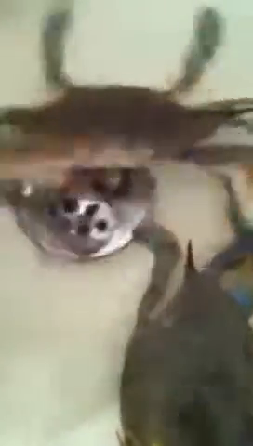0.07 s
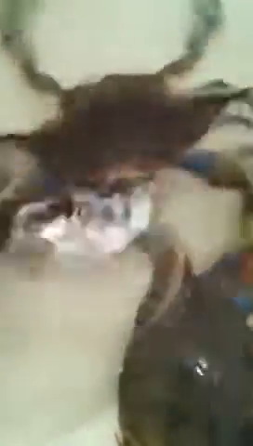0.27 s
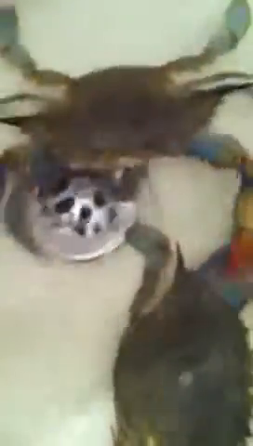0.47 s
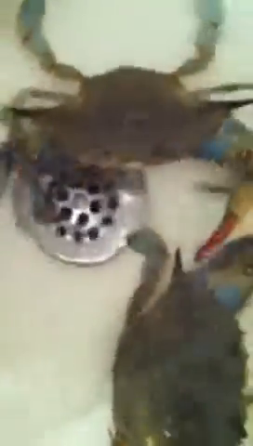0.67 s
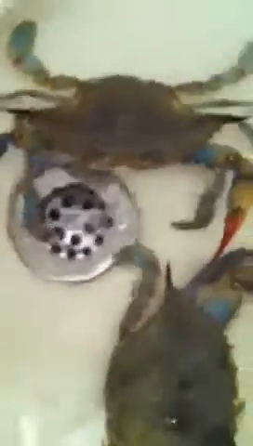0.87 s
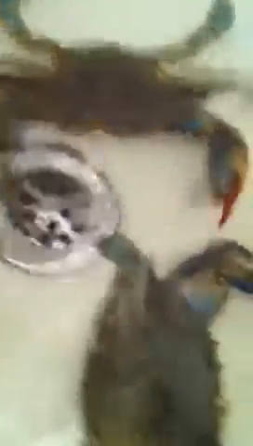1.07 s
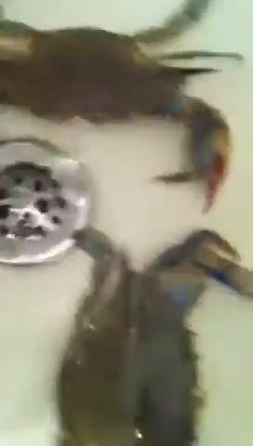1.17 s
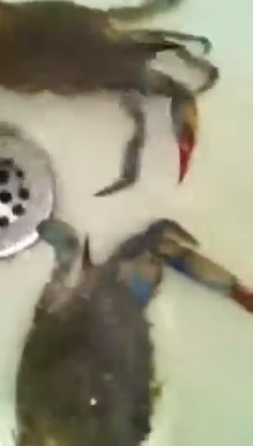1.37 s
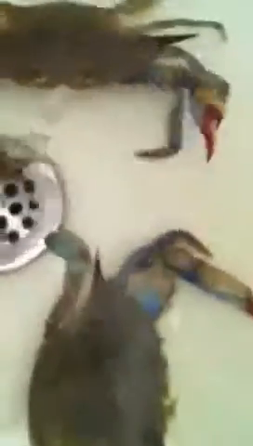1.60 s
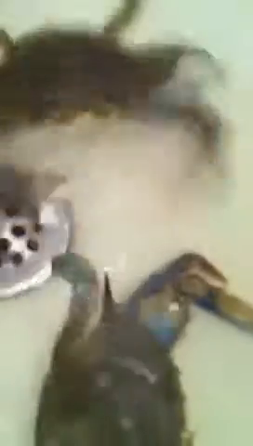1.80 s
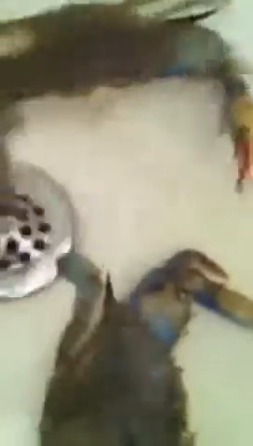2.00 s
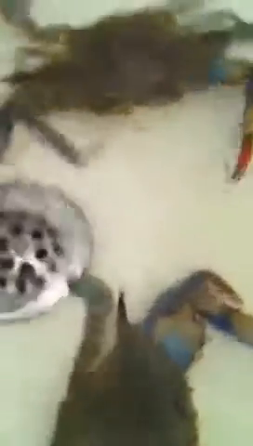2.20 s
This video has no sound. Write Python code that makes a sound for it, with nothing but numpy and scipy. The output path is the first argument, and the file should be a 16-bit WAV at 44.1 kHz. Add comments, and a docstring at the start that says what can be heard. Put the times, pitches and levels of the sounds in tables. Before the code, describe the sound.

Crab claws and shells clack against a wet tub. After faint ticks, a loud brittle cluster rattles at 0.2 s, with smaller knocks and hollow pops until about 0.4 s. Low hum and faint hiss fill the quiet gap, with barely audible scuffs. A very sharp, bright double snap hits at 1.8 s, then soft lower bloops and ticks from 1.95 to 2.2 s. The tiled room rings briefly.

```python
"""Crabs scrabble in a wet bathtub: claws and shells clack, small air pockets pop, legs scuff the wall,
and the tiled bathroom rings after each sound over a low building hum and microphone hiss.
Clacks are gritty contacts ringing shell modes, pops are dying sines gliding in pitch (most rise),
scuffs are resonant grit, the room is tub echoes plus noise tails, hum and hiss are shaped noise."""
import sys
import numpy as np
from scipy import signal
from scipy.io import wavfile
from scipy.ndimage import uniform_filter1d

SR = 44100
rng = np.random.default_rng(int(sys.argv[2]) if len(sys.argv) > 2 else 0)


def master(y):
    """Save y as 16-bit WAV."""
    cut = np.clip(np.atleast_2d(y).T, -1, 1)
    pcm = np.round(cut * 32767)  # scale
    wavfile.write(sys.argv[1], SR, pcm.astype(np.int16))


def natural_amplitude(level_db):
    """Convert a level in decibels to a linear amplitude factor, elementwise."""
    exponent = np.asarray(level_db, float) / 20
    return 10 ** exponent


N = 99225


def read(points, hz):
    """Interpolates a (Hz, value) curve on a log-frequency axis."""
    f, value = np.transpose(points)
    return np.interp(np.log(hz + 1), np.log(f + 1), value)


def add(mix, start_s, sound):
    """Mixes a sound in at start_s, cut at the end of the mix."""
    part = mix[round(start_s * SR):][:len(sound)]
    part += sound[:len(part)]


def peaked(x):
    """Scales to peak 1."""
    return x / (abs(x).max() + 1e-20)


def hum():
    """Low building hum and microphone hiss: random short-time spectra with faint patches."""
    # noise spectrum: (frequency [Hz], relative level [dB])
    hum_spectrum = [(15, -42.5), (25, -18), (27, -37), (48, -40), (64, -18.5), (107, -15.5), (140, 0.5),
                    (194, -4.5), (247, 1), (350, -14.5), (553, -16.5), (874, -16), (948, -14), (1310, -21),
                    (1420, -21.5), (2430, -23), (3640, -25), (4900, -25.5), (5920, -26), (11300, -26),
                    (15600, -26)]
    # slow drift of the low hum, used relative to its mean: (time [s], level [dB])
    hum_drift = [(0.0, -68.5), (0.09, -67), (1.16, -69), (1.65, -66), (1.82, -73.5), (2.25, -73.5)]
    rms_db, patch_rms_db = -64, 0.5
    hum_top_hz, hiss_top_hz = 446, 15850
    size, hop = 4096, 1024
    frames, hz = N // hop + 5, np.fft.rfftfreq(size, 1 / SR)

    real, imag, patches = rng.standard_normal((frames, len(hz), 3)).T
    patches = uniform_filter1d(uniform_filter1d(patches, 40, axis=0), 3, axis=1)
    shape_db = read(hum_spectrum, hz)[:, None] + patch_rms_db * patches / patches.std()
    spectra = (real + 1j * imag) * (hz < hiss_top_hz)[:, None] * natural_amplitude(shape_db)

    drift_s, drift_db = np.transpose(hum_drift)
    frame_s = (np.arange(frames) - 1) * hop / SR
    spectra[hz < hum_top_hz] *= natural_amplitude(np.interp(frame_s, drift_s, drift_db - drift_db.mean()))
    x = signal.istft(spectra, nperseg=size, noverlap=size - hop)[1][:N]
    return natural_amplitude(rms_db) * x / x.std()


def pop(level_db, start_hz, ratio, t60_s):
    """Air pocket, or a tonal ring with a clack: a dying sine whose pitch glides by ratio over half its t60."""
    rise_cycles = 1.8
    t = np.arange(0, t60_s, 1 / SR)
    pitch_hz = start_hz * ratio ** np.minimum(2 * t / t60_s, 1)
    rise = 1 - np.exp(-t * start_hz / rise_cycles)
    return natural_amplitude(level_db - 60 * t / t60_s) * rise * np.sin(2 * np.pi * np.cumsum(pitch_hz) / SR)


def clack(treble_db, mid_db, low_db, contact_s):
    """A hard tick and contact grit ring the shell's modes, levelled in three bands; the tub wall thumps."""
    # shell modes: (nominal frequency [Hz], nominal level [dB], t60 [s])
    shell_modes = [(1900, -4, 0.0013), (2600, 11, 0.0022), (3200, 9.5, 0.0019), (4100, 5, 0.0016),
                   (5630, -7.5, .002), (6870, 1, 0.0011), (7050, 5, 0.0018), (8260, 10.5, 0.0015),
                   (10430, -3.5, 0.0052), (11640, 6.5, 0.0032), (13200, 1.5, .002), (12690, 14.5, 0.001),
                   (14800, 1.5, .0015)]
    # limits of the low, upper mid and treble bands: [Hz]
    band_edges_hz = (1150, 4700, 9500, 15700)
    mode_spread_db, mode_detune = 4, 0.039  # either way
    grit_per_s, touch_s = 9000, 0.0002
    thump_db, thump_s = -29, 0.0008  # thump_db is relative to the treble level
    count = 900
    t = np.arange(count) / SR

    signs = np.sign(rng.random(count) - 0.5)
    grit = signs * (rng.random(count) < grit_per_s / SR) * np.exp(-t / abs(contact_s))
    grit[0] = 1  # first tick
    ringing = np.zeros(count)
    for mode_hz, mode_db, t60_s in shell_modes:
        u, v = rng.uniform(-1, 1, 2)
        decay = natural_amplitude(mode_db + mode_spread_db * u - 60 * t / t60_s)
        ring = decay * np.sin(2 * np.pi * mode_hz * (1 + mode_detune * v) * t)
        ringing += np.convolve(grit, ring)[:count]
    ringing *= (1 - np.exp(-t / touch_s)) ** 2

    # wall pushed, then released
    push = (1 - t / thump_s) * np.exp(-t / thump_s)
    out = natural_amplitude(treble_db + thump_db) * push * np.minimum(t / touch_s, 1)
    for band_db, limits_hz in zip((low_db, mid_db, treble_db), zip(band_edges_hz, band_edges_hz[1:])):
        sos = signal.butter(4, limits_hz, "band", fs=SR, output="sos")
        out += natural_amplitude(band_db) * peaked(signal.sosfilt(sos, ringing))
    return out


def scuff(length_s, level_db, centre_hz, width_hz):
    """Leg on the tub wall: dense grit of uneven size through a broad resonance, twice, under a stroke."""
    grit_per_s, size_spread_db = 9000, 2.5
    count = 24000  # longer strokes are cut here
    t = np.arange(count) / SR
    sign_draw, grain_draw, size_draw = rng.random((3, count))
    grains = np.sign(sign_draw - 0.5) * (grain_draw < grit_per_s / SR)
    grit = grains * natural_amplitude(-size_spread_db * np.log(size_draw + 0.0035))
    b, a = signal.iirpeak(centre_hz, centre_hz / width_hz, SR)
    rub = signal.lfilter(b, a, signal.lfilter(b, a, grit))
    stroke = np.sqrt(np.clip(1 - t / length_s, 0, 1)) * np.minimum(t / length_s / 0.14, 1)
    return natural_amplitude(level_db) * rub / rub.std() * stroke


def bathroom(x):
    """Echoes off the tub walls, then three noise tails fed in turn, each band dying at its own speed."""
    # tub wall reflections: (delay [s], level [dB])
    tub_echoes = [(.0029, -19), (.0062, -16.5), (0.0105, -22), (.0175, -39), (.0235, -24)]
    # room decay: (frequency [Hz], t60 [s])
    room_t60 = [(300, 0.8), (790, 0.16), (2090, 0.29), (5510, 0.28), (14600, 0.22)]
    # initial tail spectrum: (frequency [Hz], relative level [dB])
    room_colour = [(200, -26.5), (500, 26.5), (1000, -0.3), (3000, 2.7), (7000, 5.1), (12000, 3.5),
                   (15500, 2.5), (16300, -21.5)]
    tail_db, tail_start_s, turn_hz = -13.5, 0.003615, 7

    early = np.zeros(SR // 20)
    for delay_s, echo_db in tub_echoes:
        early[round(delay_s * SR)] = natural_amplitude(echo_db)

    count = SR // 2
    noise = rng.standard_normal((3, count)) * (np.arange(count) > tail_start_s * SR)
    hz, t, spectra = signal.stft(noise, SR, nperseg=128)
    decay_db = read(room_colour, hz)[:, None] - 60 * t / read(room_t60, hz)[:, None]
    tails = signal.istft(spectra * natural_amplitude(decay_db), SR, nperseg=128)[1]

    phase = 2 * np.pi * turn_hz * np.arange(N) / SR
    wet = np.zeros(N)
    for k, tail in enumerate(tails):
        wet += signal.fftconvolve(x * np.cos(phase + k * np.pi / 3), tail)[:N]
    return signal.fftconvolve(x, early)[:N] + natural_amplitude(tail_db) * wet / np.linalg.norm(tails[0])


def scene():
    """Crabs in the tub, the bathroom around them, the hum."""
    # air pockets, plus a few clear rings that sound with clacks (near 950 Hz at 0.21 and 0.22 s, near 7.7 kHz
    # at 2.175 s): (time [s], level [dB], start pitch [Hz], end-to-start pitch ratio, t60 [s])
    pops = [(0.001, -59.5, 2260, 1.1, 0.086), (.0285, -40, 3370, 1.17, 0.013),
            (.0405, -48.5, 3385, 0.93, 0.029), (.3185, -31, 3470, 1.02, 0.0067),
            (.3797, -33.5, 5000, .97, 0.019), (.3855, -16, 3940, 1.1, 0.0038),
            (.3932, -27.5, 1524, 1.24, 0.045), (0.413, -37.5, 1550, 1.2, 0.066),
            (1.12, -58.5, 4670, 0.92, .012), (1.7845, -40, 2420, 1.8, 0.04), (1.797, -37, 2200, .95, .015),
            (1.9, -55, 1340, 1.18, 0.12), (1.918, -41.5, 4130, 2, 0.011), (1.9575, -42.5, 580, 1.48, .03),
            (1.9665, -27.5, 836, 1.08, 0.029), (1.974, -33, 994, 1.09, 0.021),
            (2.003, -34, 926, 1.18, 0.011), (2.013, -51.5, 833, 1.8, 0.055), (1.987, -37, 870, 2.2, 0.027),
            (2.11, -49, 1900, 1.46, 0.013), (2.127, -49, 1820, 1.06, 0.018), (2.004, -46, 3630, 0.9, 0.011),
            (1.978, -45.5, 2940, 0.93, 0.03), (1.9835, -22.5, 2040, 0.94, 0.006),
            (2.0919, -29.5, 1850, 1.06, 0.022), (2.0919, -31.5, 2230, 0.894, 0.012),
            (2.162, -60.5, 4620, 1.07, .015), (2.1756, -39, 7760, 1.53, 0.009),
            (1.9545, -39, 8250, 1.02, 0.0055), (1.989, -45, 14800, 1.5, 0.0037),
            (.162, -61.5, 3200, 1.03, 0.027), (.165, -48, 1800, 0.8, 0.019), (.675, -46, 4100, 1.8, 0.013),
            (.2105, -26.5, 971, 0.58, 0.019), (.2222, -29.5, 990, 1.2, 0.018),
            (.2228, -28.5, 4120, 1.02, 0.019), (1.831, -20.5, 7240, 0.65, .005),
            (0.2325, -15, 7200, 2.8, 0.004)]
    # claw and shell contacts:
    # (time [s], treble peak [dB], upper mid peak [dB], low peak [dB], contact decay [s])
    clacks = [(0.0039, -55.0, -53.0, -64.0, 0.0007), (0.0282, -47.0, -46.0, -57.0, 0.0004),
              (0.204, -40, -43, -70, 0.003), (0.2074, -18.0, -22.0, -34.0, 0.0007),
              (0.2083, -11.0, -15.0, -24.0, 0.001), (0.2116, -7.0, -15.0, -13.0, 0.0004),
              (0.2218, -11.0, -20.0, -20.0, 0.0004), (0.2231, -16.0, -15.0, -19.0, 0.001),
              (0.2248, -20.0, -22.0, -24.0, 0.0007), (0.2305, -23.0, -29.0, -36.0, 0.001),
              (0.2874, -21.0, -29.0, -42.0, 0.001), (0.2907, -28.0, -37.0, -46.0, 0.0007),
              (0.3189, -36.0, -36.0, -46.0, 0.0007), (0.3794, -43.0, -45.0, -50.0, 0.0007),
              (0.3859, -37.0, -44.0, -45.0, 0.001), (0.3929, -22.0, -23.0, -32.0, 0.001),
              (0.4002, -23.0, -24.0, -29.0, 0.0004), (0.4014, -29.0, -30.0, -32.0, 0.0007),
              (0.7555, -52.0, -69.0, -80.0, 0.0007), (1.0225, -52.0, -72.0, -80.0, 0.0007),
              (1.2493, -51.0, -68.0, -78.0, 0.0007), (1.3966, -50.0, -75.0, -79.0, 0.0007),
              (1.785, -44.0, -47.0, -50.0, 0.0007), (1.7917, -50.0, -46.0, -55.0, 0.0007),
              (1.797, -65.0, -42.0, -52.0, 0.0007), (1.8028, -36, -40, -60, 0.002),
              (1.8055, -7.0, -21.0, -36.0, 0.001), (1.8078, -3.0, -28.0, -23.0, 0.0004),
              (1.8102, -19.0, -33.0, -38.0, 0.0007), (1.8232, -26.0, -32.0, -50.0, 0.0007),
              (1.832, -21.0, -35.0, -49.0, 0.001), (1.8375, -27.0, -36.0, -53.0, 0.0007),
              (1.9192, -53.0, -46.0, -51.0, 0.0007), (1.9251, -43.0, -56.0, -56.0, 0.0007),
              (1.9541, -41.0, -47.0, -62.0, 0.0007), (1.9578, -39.0, -42.0, -37.0, 0.0004),
              (1.9673, -48.0, -51.0, -51.0, 0.0007), (1.9835, -37.0, -40.0, -42.0, 0.0004),
              (1.9888, -42.0, -55.0, -50.0, 0.0007), (2.0056, -50.0, -47.0, -50.0, 0.0007),
              (2.0399, -50.0, -68.0, -69.0, 0.0007), (2.0921, -48.0, -51.0, -46.0, 0.0007),
              (2.1754, -39.0, -49.0, -68.0, 0.0004)]
    # leg strokes: (time [s], length [s], level [dB], centre [Hz], width [Hz])
    scuffs = [(0.15, 0.033, -56, 2315, 4000), (.674, 0.029, -60, 3889, 5000),
              (.675, 0.031, -61.5, 1490, 400), (1.055, 0.058, -69, 1640, 800),
              (1.683, 0.033, -69, 3740, 1480), (1.738, 0.064, -62.5, 2980, 1500),
              (1.746, 0.029, -64.5, 7500, 2980), (1.962, 0.055, -59.5, 9600, 9720),
              (0.207, .02, -38, 750, 536), (1.25, 0.71, -74.5, 1370, 1190), (0.252, 0.035, -53.5, 313, 162),
              (0.303, 0.06, -63, 3000, 4000), (1.807, 0.061, -53, 2500, 2960),
              (1.81, 0.039, -52.5, 627, 500), (1.8996, .03, -60, 2200, 1500)]
    floor, crabs = hum(), np.zeros(N)
    for sound, events in ((pop, pops), (clack, clacks), (scuff, scuffs)):
        for start_s, *settings in events:
            add(crabs, start_s, sound(*settings))
    return (crabs + bathroom(crabs) + floor)[None]


def top_cut(x):
    """Nothing passes above the cut-off."""
    return signal.sosfilt(signal.butter(12, 17110, fs=SR, output="sos"), x)


def record(dry):
    """Limits the band with a linear-phase low-pass."""
    edge_hz = 16900
    low_pass = signal.firwin(127, edge_hz, fs=SR)
    mix = signal.oaconvolve(dry, low_pass[None], "same")
    return top_cut(mix)


dry = scene()
out = record(dry)
master(out)
```